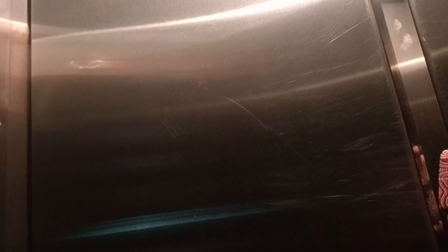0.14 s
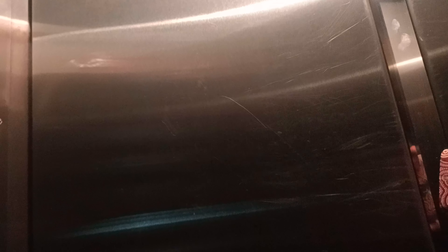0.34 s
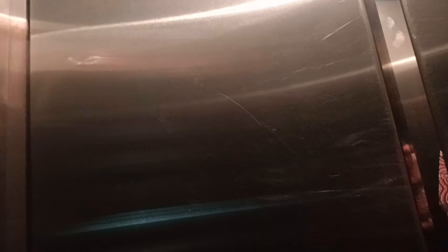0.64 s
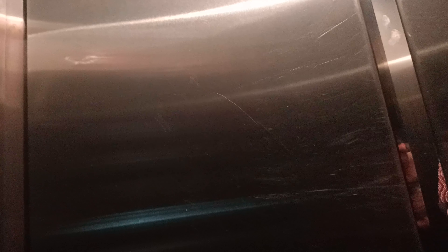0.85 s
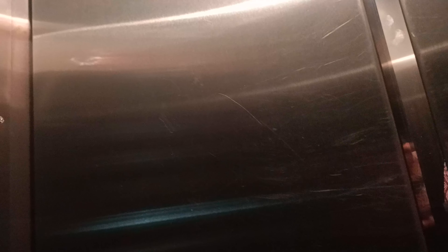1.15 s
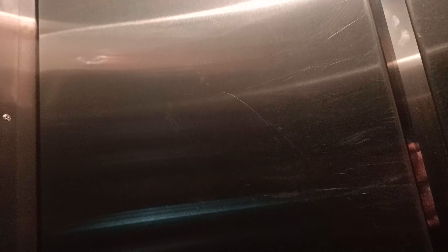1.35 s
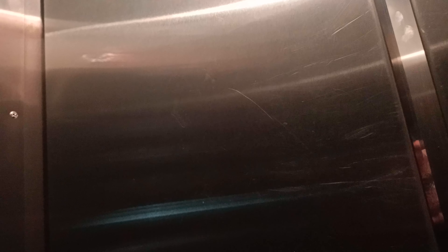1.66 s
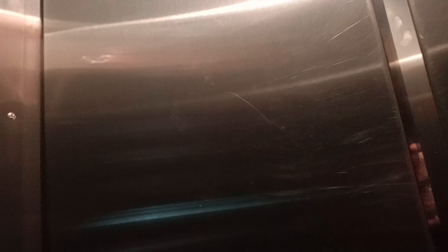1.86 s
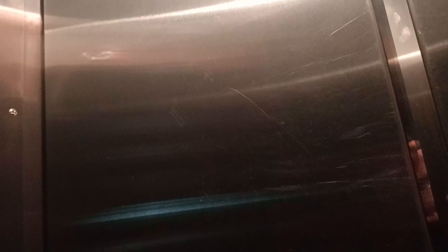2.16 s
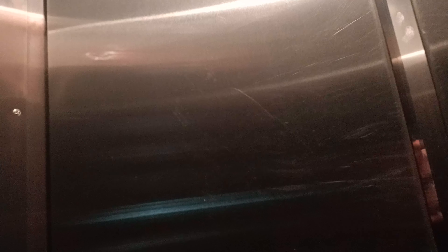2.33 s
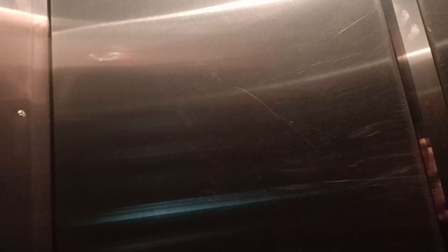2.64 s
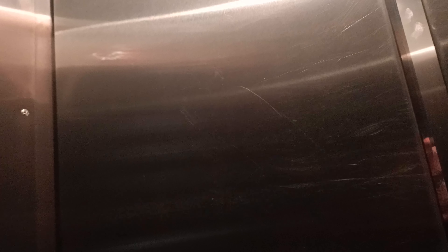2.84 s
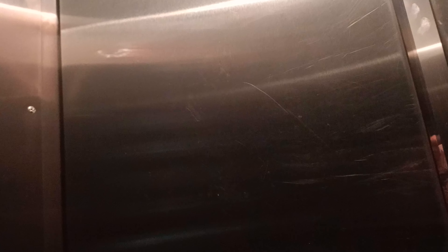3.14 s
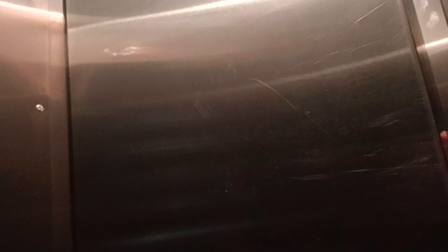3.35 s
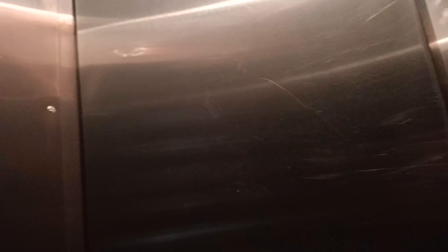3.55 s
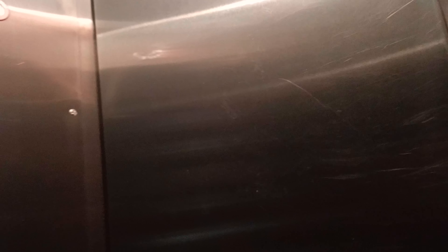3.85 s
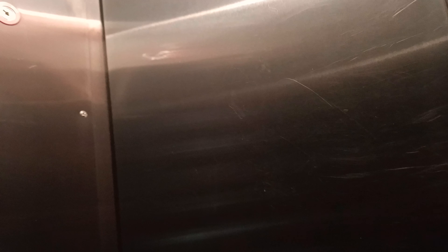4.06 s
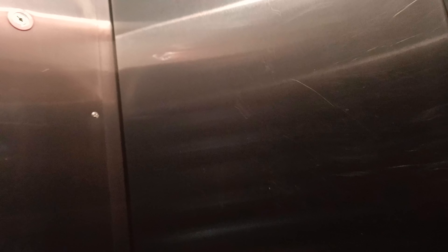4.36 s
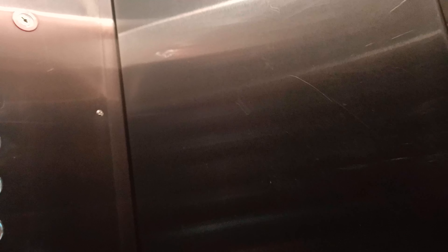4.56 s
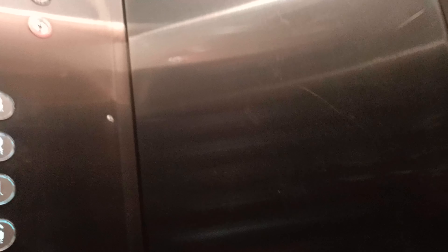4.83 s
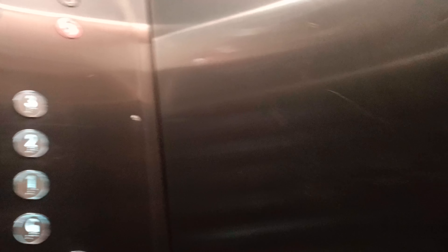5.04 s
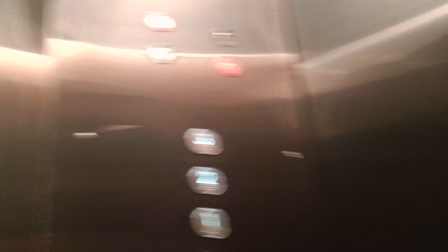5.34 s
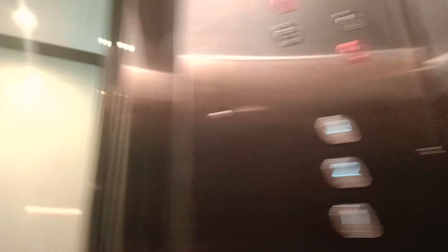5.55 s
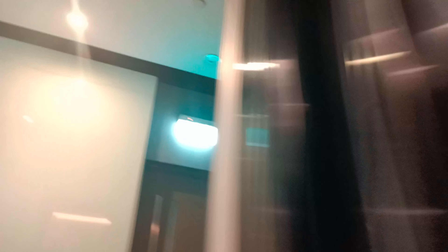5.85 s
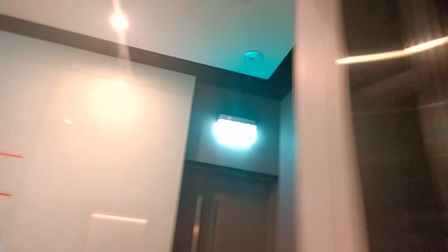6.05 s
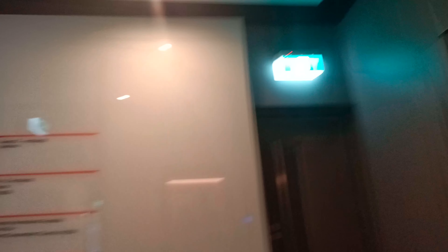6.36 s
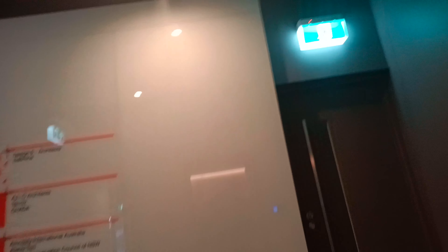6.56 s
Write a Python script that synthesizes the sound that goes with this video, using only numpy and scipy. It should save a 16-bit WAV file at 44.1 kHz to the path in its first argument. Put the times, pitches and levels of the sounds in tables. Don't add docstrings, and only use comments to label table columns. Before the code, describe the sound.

A handheld stereo microphone picks up fumbling in a quiet lift: a short strap squeak, fabric rustle, little clinks and hollow bumps. After a near-still pause, more ticks and a low jolt lead to doors sliding with a rattling rumble and latch clacks. The sound swings from left to centre as someone steps out, with a bright jingle and crisp heel ticks over faint hiss.

```python
import sys
import numpy as np
from scipy import signal
from scipy.fft import rfft, irfft
from scipy.io import wavfile
from scipy.ndimage import uniform_filter1d, map_coordinates

SR = 44100
rng = np.random.default_rng(int(sys.argv[2]) if len(sys.argv) > 2 else 0)


def invert_db(level):
    return 10 ** (np.asarray(level, dtype=float) / 20)


def store_wav(level_fs):
    pcm = np.round(np.clip(np.atleast_2d(level_fs), -1, 1) * 32767)
    wavfile.write(sys.argv[1], SR, pcm.T.astype(np.int16))


N = 295470
CLOTH_REST_DB = -85


def level(x, db=0):
    return x * invert_db(db) / np.sqrt(np.mean(x ** 2))


def curves(table):
    s, *columns = np.transpose(table)
    return [np.interp(np.arange(N) / SR, s, column) for column in columns]


def swells(table, rest_db):
    t = np.arange(0, N / SR + .002, .002)
    power = invert_db(2 * rest_db)
    for s, db, rise, fall in table:
        distance = np.maximum((s - t) / rise, (t - s) / fall)
        power = power + invert_db(2 * db - 20 * distance)
    return np.interp(np.arange(N) / SR, t, np.sqrt(power))


def colour(x, points):
    hz, db = np.transpose(points)
    f = np.arange(x.shape[-1] // 2 + 1) * SR / x.shape[-1]
    gain = invert_db(np.interp(np.log(f + 1), np.log(hz), db))
    return irfft(rfft(x) * gain, x.shape[-1])


def ring(x, hz, width):
    return signal.lfilter(*signal.iirpeak(hz, hz / width, SR), x)


def body(x, modes):
    total = 0
    for k, (hz, width, db) in enumerate(modes):
        mode = ring(ring(x, hz, 1.4 * width), hz, 1.4 * width)
        total = total + (-1) ** k * invert_db(db) * level(mode)
    return level(total)


def walk(rate):
    hold = int(SR / rate)
    steps = np.repeat(rng.standard_normal(N // hold + 1), hold)
    return 1.06 * uniform_filter1d(uniform_filter1d(steps, hold), hold)[:N]


def grains(rate, spread_db):
    out = np.zeros(3 * N)
    place = rng.integers(3 * N, size=int(3 * N * rate / SR))
    size_db = spread_db * np.minimum(rng.exponential(size=len(place)), 4)
    out[place] = rng.standard_normal(len(place)) * invert_db(size_db)
    return level(out.reshape(3, N))


def steady(x):
    envelope = uniform_filter1d(np.abs(signal.hilbert(x)), size=400)
    return level(x / (envelope + 0.52) ** 0.45)


def add(out, s, sound):
    i = max(int(s * SR), 0)
    out[..., i:i + sound.shape[-1]] += sound[..., :N - i]


def ports(x, lead_ms):
    i, half = np.arange(N), lead_ms * SR / 2000
    return np.array([map_coordinates(x, [i + half], order=3), map_coordinates(x, [i - half], order=3)])


def spread(x, shared):
    apart = np.sqrt(1 - shared ** 2)
    return x * np.array([[shared], [apart], [apart]])


# f/Hz, density/dB per Hz
AIR_COLOUR = [(150, -30), (250, -13), (292, -9.5), (330, -5.5), (380, -7.5), (831, -15), (1530, -16),
              (1640, -12.5), (6940, -22.5), (7570, -28.5), (16000, -25)]


def still_air():
    return level(colour(rng.standard_normal((2, N)), AIR_COLOUR), -70.8)


def walls(x):
    t, t60 = np.arange(int(.5 * SR)) / SR, 0.12
    wash = rng.standard_normal((2, len(t))) * 0.0018 ** (t / t60) * np.clip(t / 0.001, 0, 1)
    wash /= np.sqrt(np.sum(wash ** 2, axis=1, keepdims=True))
    echo = signal.fftconvolve(x[None], wash, axes=1)[:, :N]
    return invert_db(-7) * colour(echo, [(130, -14), (500, 4.5), (16000, 3.5)])


# f/Hz, width/Hz, level/dB
CAR_MODES = [(35.9, 14, 4), (64, 29.6, -8)]
# t/s, peak level/dB, swell or fade by 10 dB/s
JOLTS = [(.05, -52, .3), (.4, -51, .2), (.8, -53, .3), (1.15, -56, .3), (1.51, -52, .2), (1.96, -49.5, .1),
         (2.63, -51.5, .27), (3.3, -52, .2), (3.65, -38.5, .13), (4.0, -49, .12), (4.14, -48, .07),
         (4.46, -45.5, .12), (4.83, -39, .22), (5.11, -38, .1), (5.3, -40, .2), (5.55, -48, .3),
         (6.03, -47, .18), (6.36, -54, .08), (6.7, -47, .17)]


def car_sway():
    sway = swells([(s, db, span, span) for s, db, span in JOLTS], -64)
    return sway * steady(body(rng.standard_normal((3, N)), CAR_MODES))


# t/s, peak level/dB, swell by 10 dB/s, fade by 10 dB/s
WHISTLES = [
    (2.5, -67, .6, .04),
    (2.84, -71, .06, .3),
    (2.95, -70, .1, .15),
    (3.06, -68, .12, .1),
]
# t/s, peak level/dB, f/Hz, ring t60/s
FITTINGS = [(3.3, -57, 2500, .08), (3.353, -48, 1370, .1), (3.36, -53, 1500, .08), (3.703, -55, 1670, .05),
            (3.93, -50, 215, .3), (5.44, -49, 700, .2), (5.855, -48, 600, .12), (6.205, -43, 4300, .12),
            (6.206, -44, 3400, .09), (6.24, -50, 4250, .12), (3.375, -55, 900, .15), (3.46, -59, 2950, .08),
            (3.505, -59, 2400, .06), (4.78, -50, 1520, .05), (3.505, -53, 1440, .07),
            (3.58, -59, 1450, .08), (5.175, -47, 1500, 0.062), (5.225, -50, 3550, .12),
            (5.257, -46, 1500, .07), (6.208, -46, 5290, .35), (.5, -66, 5500, .6), (6.521, -40, 1550, .05)]


def fittings():
    breath = ring(rng.standard_normal(N), 2200, 160)
    out = swells(WHISTLES, -100) * steady(level(breath))
    t = np.arange(8192) / SR
    for s, db, hz, t60 in FITTINGS:
        shape = np.minimum(t / 0.0018, 1) * 1e-3 ** (t / t60)
        add(out, s, invert_db(db) * shape * np.sin(2 * np.pi * hz * t))
    return out


# t/s, peak level/dB, f/Hz, ring t60/s
THUDS = [(.1, -43, 130, .06), (.18, -43, 115, .1), (0.278, -45, 185, 0.1), (0.305, -44, 215, 0.12),
         (0.553, -44, 190, 0.11), (0.793, -38.5, 127.7, 0.18), (0.828, -39, 173, 0.21),
         (1.242, -53.5, 170, 0.19), (1.759, -55.5, 275, 0.19), (1.922, -44.5, 221, 0.056),
         (2.09, -56, 350, .08), (2.17, -55, 290, .12), (2.278, -52, 300, 0.093), (2.422, -50, 382, 0.12),
         (3.07, -45, 190, 0.093), (3.269, -44, 124, 0.12), (3.519, -40, 133.5, 0.14),
         (4.082, -48.5, 135, 0.13), (4.14, -47.5, 167.5, 0.22), (4.217, -46, 220, 0.11),
         (4.999, -35, 170, 0.2), (5.052, -35, 170, .15), (5.135, -34, 174, .25), (5.17, -34, 170, .15),
         (5.218, -38, 144, 0.13), (5.285, -38, 200, .1), (5.849, -42, 434, 0.085),
         (6.142, -42.5, 200, 0.13), (6.453, -41.5, 141, 0.13), (6.519, -46.5, 406, 0.43)]
# t/s, peak level/dB, f/Hz, ring t60/s
HOLLOW = [(.385, -48, 250, .08), (1.925, -49, 390, 0.08), (1.99, -57, 380, .08), (2.262, -57, 600, .06),
          (2.428, -49, 390, .1), (2.51, -59, 620, .1), (3.37, -55, 480, .1), (6.03, -52, 600, .07),
          (6.092, -51, 610, .05), (6.433, -48, 398, 0.07), (6.455, -53, 540, .12), (.56, -53, 620, .08),
          (3.075, -55, 620, .06)]


def thuds():
    out, t = np.zeros(N), np.arange(16384) / SR
    for s, db, hz, t60 in THUDS + HOLLOW:
        second, third = rng.random(2)
        phase = 2 * np.pi * hz * t
        fade = 0.003 ** (t / max(t60, .02))
        tones = np.sin(phase)
        tones += .5 * np.sin((1.45 + 0.24 * second) * phase) * fade
        tones += 0.63 * np.sin((2.11 + 0.96 * third) * phase) * fade ** 2
        add(out, s - .003, invert_db(db) * np.minimum(t / 0.003, 1) * fade * tones)
    return out


# t/s, low ring level/dB, low ring f/Hz, high ring level/dB, high ring f/Hz
CHINKS = [(.216, -40, 5430, -51, 15600), (.218, -52, 6000, -58, 11800), (.407, -58, 5400, -60, 12100),
          (.4275, -40, 5400, -55, 11900), (.43, -50, 6200, -58, 13700), (.445, -55, 4900, -58, 15700),
          (.601, -60, 6380, -61, 11800), (3.3518, -54, 5400, -62, 11900), (3.458, -52, 5350, -52, 15700),
          (3.487, -60, 5860, -57, 11900), (3.503, -64, 6000, -50, 15340), (3.7045, -59, 5950, -61, 15600),
          (3.7154, -58, 5560, -62, 15700), (3.8324, -63, 5330, -48, 15700), (4.144, -70, 5770, -52, 11800),
          (4.156, -72, 5770, -42, 11850), (4.422, -43, 5160, -57, 15200), (4.86, -46, 5660, -62, 15700),
          (6.206, -27, 5360, -56, 12600), (6.2354, -38, 5320, -55, 13000), (6.266, -44, 5350, -63, 13700)]


def chinks():
    out, t = np.zeros(N), np.arange(8192) / SR
    for s, low_db, low_hz, high_db, high_hz in CHINKS:
        rattle = rng.standard_normal(len(t)) * np.minimum(t / 0.002, 1)
        rattle *= np.exp(-t / .009) + 0.05 * np.exp(-t / 0.045)
        rings = [(low_db - 3.5, low_hz, 0.017), (high_db, min(high_hz, 15800), 0.019)]
        for db, hz, t60 in rings:
            width = np.log(1000) / np.pi / t60
            mode = ring(ring(rattle, hz, width), hz, 6 * width)
            add(out, s, mode * invert_db(db) / np.abs(mode).max())
    return out


def stroke(table, rough):
    hz, first_db, upper_db = curves(table)
    t = np.arange(N) / SR
    phase = 2 * np.pi * np.cumsum(hz * (1 + rough * walk(300))) / SR
    partials = [(2, 1), (3, .5), (4, 0.23), (5, .4), (6, 0.25)]
    upper = sum(gain * np.sin(k * phase) for k, gain in partials)
    tone = 1.6 * (invert_db(first_db) * np.sin(phase) + invert_db(first_db + upper_db) * upper)
    tone = ports(tone, np.interp(t, [.045, .075], [.92, .1]))
    tone *= invert_db(3 * np.array([walk(90), walk(90)])) * np.clip(t / .012, .2, 1)
    dull = level(ring(rng.standard_normal((2, N)), 2200, 1300))
    bright = level(ring(rng.standard_normal((2, N)), 3900, 900))
    fast = np.clip((hz - 520) / 280, 0, 1)
    scrape = np.maximum(np.cos(phase), 0) ** 3 * ((1 - fast) * dull + 1.9 * fast * bright + .2)
    scrape = colour(scrape, [(5200, 0), (7500, -18), (12000, -12)])
    touching = np.clip((table[-1][0] - t) / .02, 0, 1) * (t >= table[0][0])
    return touching * (tone + 1.4 * invert_db(first_db + 1.5) * scrape)


# t/s, slip rate f/Hz, pressure level/dB, upper partials level/dB re the first
RUB = [
    (0, 510.4, -58, 0),
    (.02, 536.5, -51, -2),
    (.06, 552, -48, -7),
    (.1, 770, -45, -6),
    (.12, 800, -50, -5),
    (.15, 680, -45, -9),
    (.17, 420, -50, -14),
    (.205, 270, -54, -20),
]
RUB_AGAIN = [
    (.285, 470, -70, -10),
    (.31, 530, -67, -10),
    (.342, 650, -59, -10),
    (.366, 700, -57, -10),
    (.39, 600, -66, -10),
    (.43, 560, -74, -10),
]


def strap():
    return stroke(RUB, .05) + stroke(RUB_AGAIN, .2)


# t/s, peak level/dB, swell by 10 dB/s, fade by 10 dB/s
MOVES = [(.13, -45, .25, .05), (.34, -53.5, .08, .15), (.66, -62, .15, .15), (.802, -56, .012, .11),
         (1.06, -57, .12, .1), (1.25, -58.5, .35, .09), (1.36, -66, .05, .7), (1.75, -63.5, .04, .9),
         (2.09, -63, .02, .05), (2.285, -60, .04, .05), (2.43, -62, .3, .1), (3.02, -58.5, .17, .22),
         (3.32, -56.5, .13, .3), (3.81, -62.5, .035, .12), (3.97, -66.5, .2, .12), (4.43, -66, .04, .2),
         (4.88, -59, .28, .12), (5.55, -58, .2, 2.5), (6.06, -59, .08, .08), (6.27, -53, .1, .2),
         (6.53, -47.5, .04, .1), (6.64, -56, .1, .05), (6.68, -48, .03, .017)]


def body_moves():
    return swells(MOVES, CLOTH_REST_DB)


def creaks():
    spots = np.geomspace(1100, 4400, num=14) * (1 + .04 * rng.standard_normal(14))
    return level(sum(level(ring(ring(grains(40, 2.4), hz, 130), hz, 400)) for hz in spots))


# f/Hz, density/dB per Hz
WEAVE = [(470, -6), (800, -10), (921, -13.5), (1150, -15), (1600, -8), (2750, -2.5), (4970, -8.5),
         (5510, -4.5), (7500, -24.5), (9750, -46), (16500, -120)]
# f/Hz, density/dB per Hz
FIBRE = [(3820, -56), (6500, -15), (7790, -3), (9660, -4.5), (11400, -3.5), (15000, 3), (16000, -26.5)]
# t/s, peak level/dB, swell by 10 dB/s, fade by 10 dB/s
BRUSHES = [
    (4.94, -50, .01, .035),
    (5.0, -43.5, .012, .016),
    (5.04, -54, .03, .2),
    (5.29, -55, .8, .012),
    (5.345, -44, .003, .05),
    (5.442, -51, .004, .08),
]
# t/s, peak level/dB, fade by 10 dB/s
FLICKS = [
    (.2, -70, .3),
    (.44, -60, .03),
    (3.71, -59, .02),
    (4.94, -69, .05),
    (1.0, -69, .4),
    (5.03, -69, .4),
    (6.21, -47.5, .06),
]
# t/s, peak level/dB, swell by 10 dB/s, fade by 10 dB/s
RATTLES = [
    (3.4, -64, .15, .25),
    (4.86, -61, .2, .1),
    (5.07, -55, .06, .15),
    (5.27, -59, .1, .05),
    (5.9, -62, .05, .25),
]


def cloth(moves):
    rustle = np.hypot(moves, swells(BRUSHES, CLOTH_REST_DB))
    flicks = swells([(s, db, .012, fall) for s, db, fall in FLICKS], -95)
    slips = grains(4000, 1.4) + .8 * rng.standard_normal((3, N))
    slips *= invert_db(1.2 + 0.5 * walk(18))
    snaps = creaks()
    weave = level(colour(slips, WEAVE)) + invert_db(-9) * snaps
    fibre_gain = np.hypot(flicks, invert_db(-72.5) * (moves / invert_db(-60)) ** .75)
    return rustle * weave + swells(RATTLES, -100) * snaps + fibre_gain * level(colour(slips, FIBRE))


# f/Hz, width/Hz, level/dB
DOOR_MODES = [(61, 24, -8), (104, 35, -10), (135, 28, -5), (170, 24, -5), (212.2, 33.4, -3.5),
              (280.4, 52, -11)]
PANEL_MODES = [(326, 53, 0), (399.4, 63, -3), (521, 146, -3), (687, 95, -5.5), (846, 196, -5.5)]
TRACK_MODES = [(1100, 450, 0.5), (1400, 270, 0.5), (1800, 890, -0.5)]
# t/s, rolling level/dB
ROLLING = [(0, -40), (.03, -58), (.35, -51), (.58, -63), (1.6, -71), (2.1, -61), (2.7, -66), (3.11, -69),
           (3.3, -51), (3.52, -48), (3.7, -56), (4.2, -53), (4.5, -57), (4.79, -45.5), (5.15, -37.5),
           (5.55, -46.5), (6.3, -55), (6.47, -55)]


def doors(moves):
    door_db, = curves(ROLLING)
    load = np.interp(np.arange(N) / SR, [4.25, 4.55, 5.35, 5.55], [0, 1, 1, 0])
    panel_db = -13 + 4 * load
    grit_db = -68 + 13.5 * load
    buzz = np.hypot(invert_db(door_db + panel_db), moves * invert_db(-7.5))
    scuff = np.hypot(invert_db(grit_db + .8 * (door_db + 38)), moves * invert_db(-14))
    bumps = grains(300, 2.03) + 0.82 * rng.standard_normal((3, N))
    grit = grains(500, 3.0) + 0.6 * rng.standard_normal((3, N))
    leaves = invert_db(door_db) * body(bumps, DOOR_MODES)
    panels = buzz * invert_db(2.0 + 1.13 * walk(24.99)) * body(bumps, PANEL_MODES)
    track = scuff * invert_db(3.0 + 2.3 * walk(30)) * body(grit, TRACK_MODES)
    return leaves, panels, track


# t/s, peak level/dB, centre f/Hz
TAPS = [(.409, -51, 2750), (.4299, -40, 2200), (.5482, -46.5, 2340), (.6025, -53, 2440), (.7294, -54, 2180),
        (.7913, -36.5, 1100), (.8092, -40.5, 988), (1.1986, -49, 1470), (1.739, -52, 2230),
        (1.92, -56, 1010), (2.0799, -53, 1540), (2.26, -54, 2100), (2.2798, -52, 1800), (2.38, -54, 2170),
        (2.4163, -47, 3200), (3.0696, -51, 2200), (3.3524, -43, 1330), (3.3994, -46, 4820),
        (3.4642, -46.5, 2960), (3.5072, -48.5, 1440), (3.703, -46, 1670), (3.8009, -51, 3400),
        (3.9564, -50.5, 2970), (4.0394, -52.5, 2570), (4.136, -57, 2460), (4.2023, -53.5, 1680),
        (4.4253, -49, 2480)]
# t/s, peak level/dB, centre f/Hz, ring t60/s, broad share/0-1
CLACKS = [(4.938, -40, 3050, .17, .5), (4.9927, -27.5, 2480, .13, .45), (5.0416, -42.5, 2700, .15, .1),
          (5.1721, -44, 1500, .13, .23), (5.2559, -45, 1530, .17, .2), (5.2994, -39.5, 1180, .076, .7),
          (5.3422, -34.5, 3300, .19, .24), (5.439, -38.5, 3100, .082, .3), (5.7766, -47.5, 1250, .2, .6),
          (5.8408, -44, 1080, .16, .3), (5.862, -48, 1500, .12, .5), (5.9209, -46.5, 1130, .12, .55),
          (6.2037, -31.5, 4440, .21, .1), (6.2354, -41, 4220, .13, .6), (6.5214, -34, 3980, .12, .64),
          (6.552, -38, 1250, .1, .9), (6.6782, -34, 4200, .044, .98)]
# t/s, peak level/dB, centre f/Hz, length/s
TICKS = [
    (5.1745, -38, 1530, 0.0015),
    (5.343, -34, 2700, 0.0012),
    (6.524, -29.5, 3900, 0.00076),
    (6.55, -39, 1250, 0.0012),
    (6.6782, -26, 4330, 0.00061),
]
# f/Hz, level/dB
CAPSULE = [(100, 11), (900, 4), (2500, 2.5), (4500, 1.5), (5400, -4), (6500, -1), (8000, -14.5),
           (11000, -13), (14000, -10), (17000, -24)]


def clacks():
    out, t = np.zeros((3, N)), np.arange(8192) / SR
    taps = [(s, db, hz, .12, .75) for s, db, hz in TAPS]
    for s, db, hz, t60, broad in taps + CLACKS:
        noise = rng.standard_normal((3, len(t)))
        burst = level(ring(noise, hz, 0.56 * hz)) * (1 - broad) + broad * noise
        contact = 0.27 * np.exp(-t / 0.0033)
        tail = .5 * 0.00049 ** (t / max(t60, .01))
        add(out, s - .001, burst * np.minimum(t / 0.001, 1) * (contact + tail) * invert_db(db))
    for s, db, hz, length in TICKS:
        tick = np.sin(2 * np.pi * hz * t) + 0.52 * rng.standard_normal((3, len(t)))
        add(out, s, tick * np.exp(-t / max(length, .0002)) * invert_db(db))
    return colour(out, CAPSULE)


# t/s, left ahead of right/ms
LEAD = [
    (0, .48),
    (5.3, 0.47),
    (5.7, 0.025),
    (6.1, -0.14),
    (6.7, -0.15),
]


def scene():
    lead_ms, = curves(LEAD)
    moves = body_moves()
    leaves, panels, track = doors(moves)
    small = chinks() + thuds()
    rub, hits = strap(), clacks()
    wide = spread(car_sway() + leaves, 0.995) + spread(panels, 0.81)
    wide += spread(track + cloth(moves) + hits, 0.37)
    direct = ports(wide[0] + small, lead_ms) + wide[1:] + rub + ports(fittings(), lead_ms / 3)
    echo = walls(small + hits[0] + 0.93 * rub[0])
    return direct + echo + still_air()


def roll_off(x):
    return signal.sosfilt(signal.butter(12, 16610, fs=SR, output="sos"), x)


# f/Hz, left minus right level/dB
PORT_TILT = [(60, .5), (110, 1.5), (200, -1), (380, 0.5), (700, 1.5), (1290, 2.5), (2380, 2.5), (4400, 4.5),
             (8120, 3.0), (15000, 1.5)]


def record(dry):
    left = colour(dry[0], [(hz + 20, db / 2) for hz, db in PORT_TILT])
    right = colour(dry[1], [(hz + 20, -db / 2) for hz, db in PORT_TILT])
    top = signal.ellip(8, .2, 60, 15850, fs=SR, output="sos")
    mix = signal.sosfilt(top, [left, right])
    return roll_off(mix)


dry = scene()
out = record(dry)
store_wav(out)
```